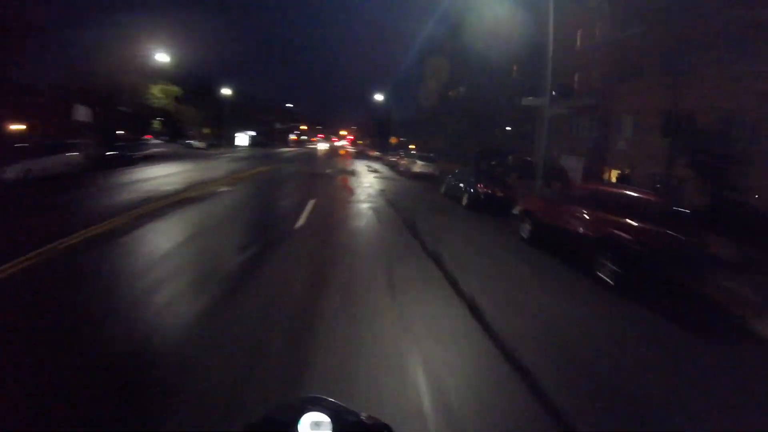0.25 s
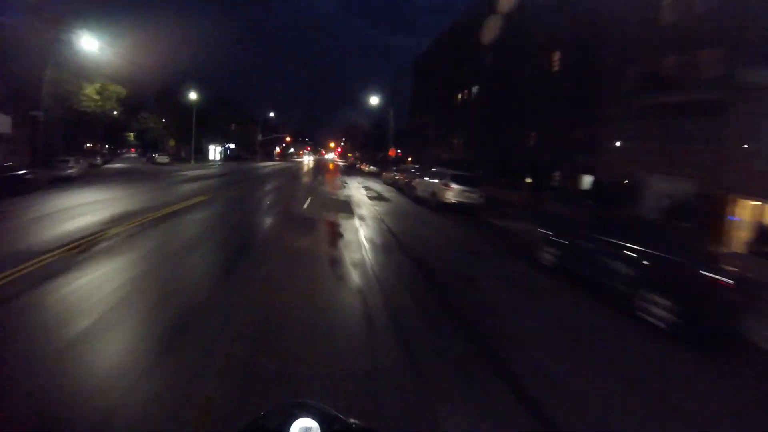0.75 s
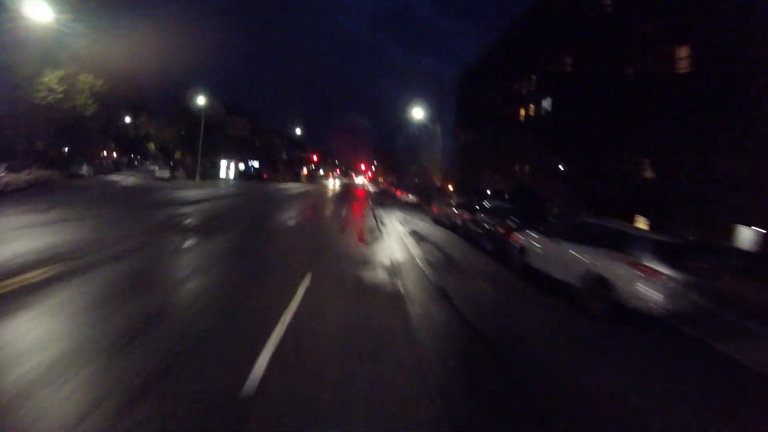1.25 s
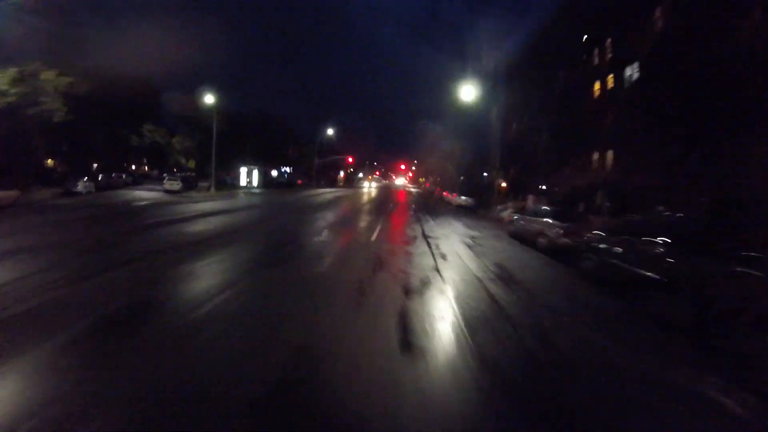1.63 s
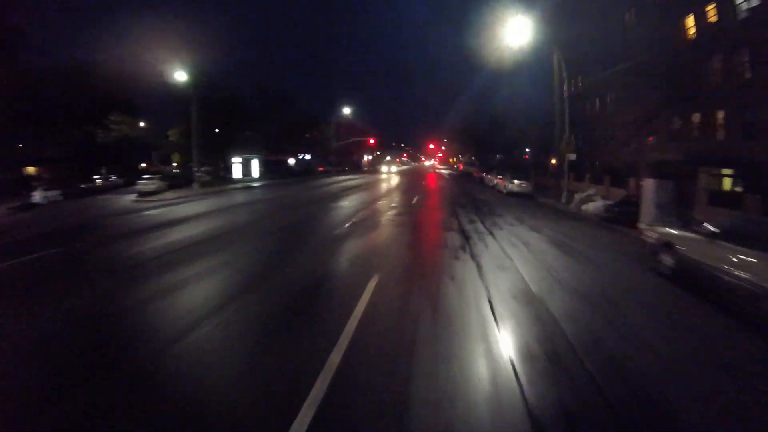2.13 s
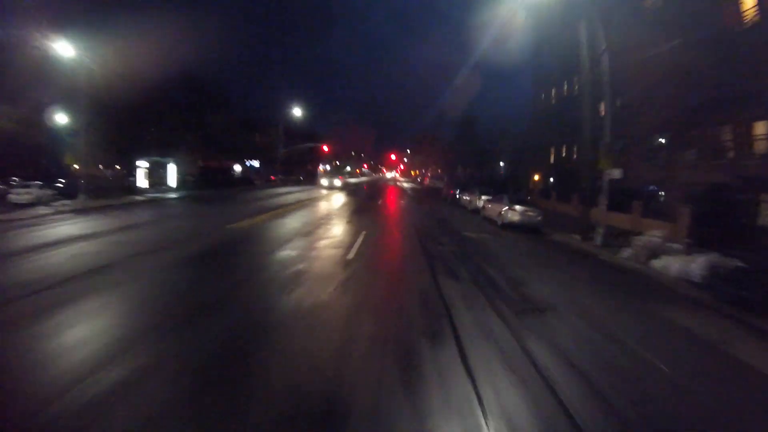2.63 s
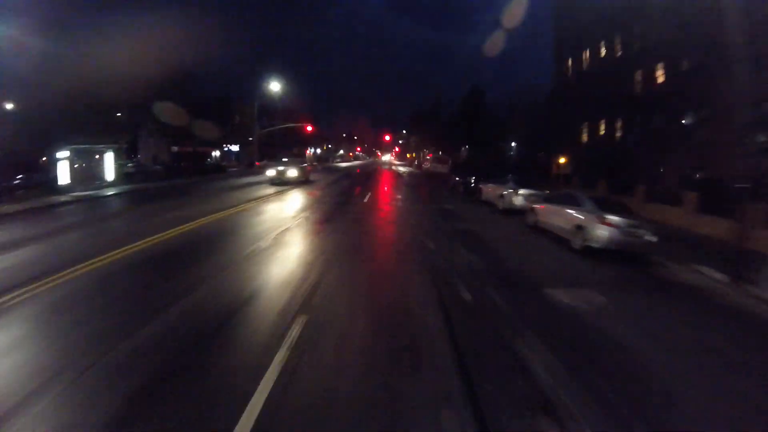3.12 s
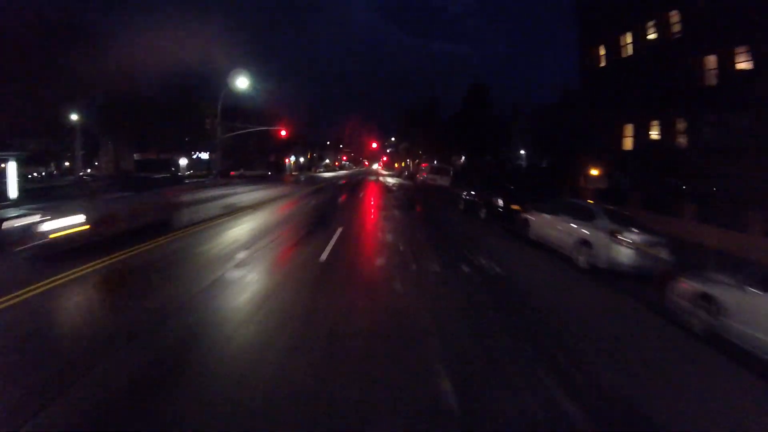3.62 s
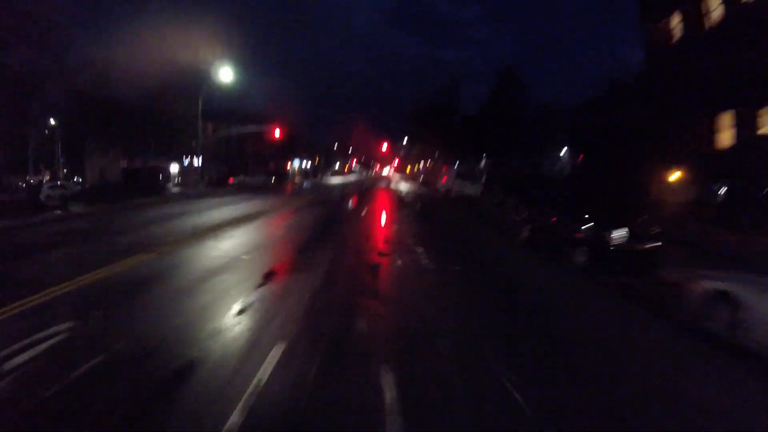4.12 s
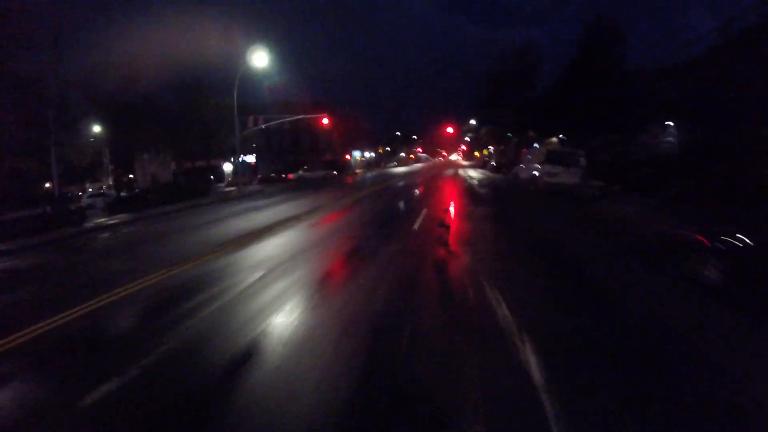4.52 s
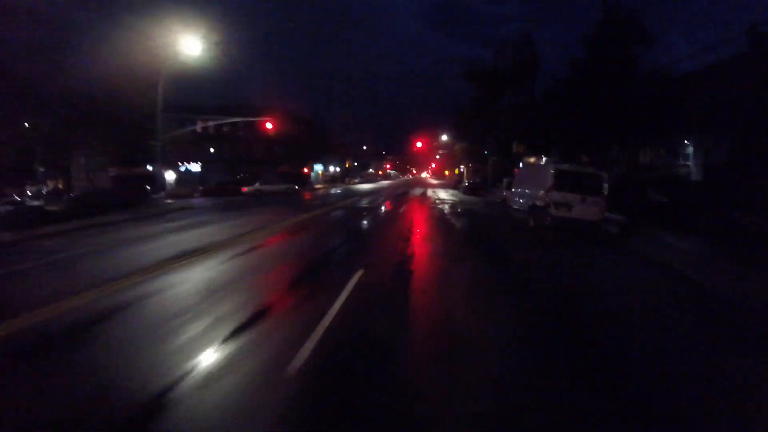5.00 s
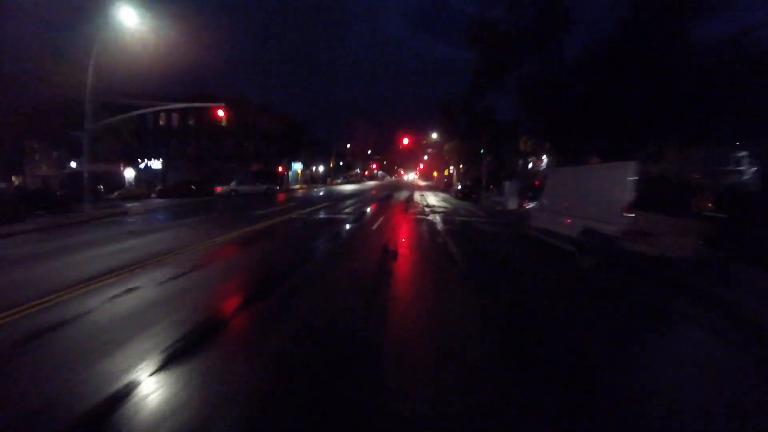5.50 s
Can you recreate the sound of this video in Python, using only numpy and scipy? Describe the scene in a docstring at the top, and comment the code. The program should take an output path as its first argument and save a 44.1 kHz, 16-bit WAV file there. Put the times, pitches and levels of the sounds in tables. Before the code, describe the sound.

An onboard motorcycle ride on a wet street, heard close through a small microphone shut in a case: muffled, mono, dull on top, peaks softly rounded. From 0 to 2.7 s a strong, smooth low engine hum slides gradually down under engine braking, then falls steeply until about 3.1 s. There, with the clutch pulled, it gives way to quieter, slow, uneven idle thumps. Around 3.55 s the hum returns, swooping up to a loud peak near 3.8 s, then settles and sinks steadily to the end at about 5.75 s. Fluttering low wind buffets and roar run throughout. Tyre hiss on water is clear at first, dips near 1.8 s, and grows much fainter after 4.3 s. Light valve clatter and a faint high buzz lie beneath. Road bumps give short dull knocks and rattles around 0.6-1.7 s, 3.5 s, 4.3 s and 5-5.6 s. Dry and open, without echo.

```python
"""Motorcycle slowing on a wet street

Heard from a small microphone shut in a case. The exhaust hums under engine braking (sines at firing orders),
gives way to uneven idle thumps (rung resonator) while the clutch is pulled, then climbs back in the lower gear.
Wind buffets and roars, tyres hiss through water, the case buzzes faintly (noise in flickering bands).
Valve gear clatters (noise in casing resonances); road bumps jolt the mount (rung clicks and noise bursts)."""
import sys
import numpy as np
from scipy import signal
from scipy.fft import rfft, irfft, next_fast_len
from scipy.io import wavfile

SR = 44100
rng = np.random.default_rng(int(sys.argv[2]) if len(sys.argv) > 2 else 0)


def materialize(psi):
    """Save the field psi as 16-bit PCM at rate SR to the path in sys.argv[1].

    A 1-D psi becomes a single channel; in a 2-D psi each row is a channel.
    """
    bounded = np.clip(np.atleast_2d(psi).T, -1, 1)
    quanta = np.round(bounded * 32767).astype(np.int16)
    wavfile.write(sys.argv[1], SR, quanta)


N = 253575

# wind on the case: (time [s], buffet level [dB], roar level [dB])
WIND_LEVELS = [(0.0, -25, -22), (0.2, -28, -24), (0.5, -19, -28.5), (0.63, -31, -22.5), (0.7, -24, -27),
               (1.07, -26, -26.5), (1.22, -25, -22), (1.31, -23.5, -27.5), (1.5, -23, -30.5),
               (1.73, -18.5, -26), (2.05, -31, -28.5), (2.15, -22.5, -29.5), (2.24, -31, -31.5),
               (2.7, -28, -28.5), (2.95, -33, -25.5), (3.1, -30.5, -27), (3.45, -20, -25),
               (3.88, -20, -21.5), (4.18, -28.5, -25.5), (4.3, -22.5, -29), (4.7, -26, -31),
               (5.26, -26.5, -33), (5.6, -20.5, -30), (5.75, -21, -35)]
# relative noise density of the buffets: (frequency [Hz], density [dB per Hz])
BUFFET_SPECTRUM = [(20, -2.5), (40, -5), (80, -1.5), (160, -6.5), (250, -12), (400, -31.5)]
# relative noise density of the wind roar: (frequency [Hz], density [dB per Hz])
ROAR_SPECTRUM = [(80, -5), (160, 0), (300, 0), (500, -3), (700, -15.5), (1200, -22)]
# tyre hiss on the wet road: (time [s], level [dB])
HISS_LEVELS = [(0.03, -31.5), (0.31, -28.5), (0.38, -36.5), (0.42, -32), (1.2, -31.5), (1.4, -30),
               (1.56, -32), (1.59, -36), (1.7, -34), (1.79, -36.5), (1.83, -41.5), (1.87, -35.5),
               (2.0, -31.5), (2.65, -30.5), (3.1, -33.5), (3.53, -33), (3.6, -29.5), (3.7, -30.5),
               (3.88, -35.5), (4.28, -35.5), (4.31, -42), (4.36, -36), (4.41, -42), (4.92, -42),
               (4.96, -41.5), (5.02, -44), (5.37, -45.5), (5.48, -41), (5.59, -45.5), (5.66, -48),
               (5.75, -48)]
# relative noise density of the hiss: (frequency [Hz], density [dB per Hz])
HISS_SPECTRUM = [(350, -25), (600, -3), (2490, -16), (3090, -21), (3770, -28.5), (4900, -50), (8290, -120)]
# treble of the hiss against its body: (time [s], gain [dB])
TREBLE_GAINS = [(0.0, -0.5), (1.6, 0.8), (2.2, -3), (2.9, -0.5), (3.5, 0), (4.1, 1.3), (4.6, -2.5),
                (5.2, 1.8), (5.75, 1.2)]
# case buzz before it follows the hiss: (time [s], level [dB])
BUZZ_LEVELS = [(0.0, -58), (1.1, -55.5), (1.5, -60), (2.7, -61), (3.1, -63.5), (3.6, -59.5), (4.2, -61.5),
               (5.0, -58), (5.75, -57.5)]
# two bands passed by the case, notch between: (frequency [Hz], relative density [dB per Hz])
CASE_SPECTRUM = [(3800, -9), (4400, -1), (5000, 1), (5500, -1.5), (6000, -19.5), (6480, -0.5),
                 (7000, -10.5), (8200, -15), (9000, -19.5), (9800, -34)]
# road bumps that jolt the mount: (time [s], rattle drive [dB], thud drive [dB], tick drive [dB])
BUMP_EVENTS = [(0.592, -14, -15, -55), (0.807, -15, -24, -57), (0.966, -9, -17.5, -58),
               (1.154, -26, -7, -54), (1.456, -24.5, -19.5, -60), (1.53, -18, -20, -56),
               (1.674, -12, -11.5, -53), (1.716, -17, -10, -51), (3.454, -10, -12, -60),
               (3.491, -19, -24, -59), (3.53, -25, -15, -60), (3.58, -22, -6, -60), (3.884, -12, -28, -50),
               (4.278, -20, -23, -58.5), (4.349, -11, -18.5, -59), (4.949, -16.5, -28, -52),
               (5.115, -22, -20, -55), (5.451, -18, -23, -60), (5.494, -16, -19, -56),
               (5.543, -19, -15, -54), (5.583, -19, -18, -60)]
# mount resonances: (frequency [Hz], relative gain [dB], t60 [s])
MOUNT_MODES = [(345, 3, 0.012), (700, 3, 0.0043), (1400, -12.5, 0.0043), (2600, -21.5, 0.01)]
# engine casing resonances under the valve gear: (frequency [Hz], width [Hz], level [dB])
CASING_MODES = [(1090, 150, -62.5), (1508, 74, -57.5), (1820, 56, -63), (2280, 120, -62.5),
                (2850, 100, -61.5), (3430, 170, -71.5), (4800, 58, -72.5), (5300, 100, -76)]
# clutch: (pulled [s], let go [s])
CLUTCH_TIMES_S = (3.08, 3.56)
# engine speed through two gears: (time [s], firing rate [Hz])
FIRING_RATES = [(0.0, 138.8), (0.3, 134.8), (1.4, 123.1), (1.6, 120.2), (1.8, 119.7), (2.6, 112.2),
                (2.7, 110.0), (2.76, 105.8), (2.95, 75.6), (3.1, 57.3), (3.55, 66.7), (3.65, 82.3),
                (3.7, 96.1), (3.84, 125.5), (3.9, 118.7), (4.0, 120.1), (4.6, 110.3), (5.0, 100.9),
                (5.75, 84.8)]
# exhaust hum: (time [s], fundamental level [dB], second order level [dB])
HUM_LEVELS = [(0.0, -17.5, -25), (0.2, -15.5, -31.5), (0.4, -14.5, -27), (0.6, -16.5, -26.5),
              (1.0, -14, -24.5), (1.2, -17, -23.5), (1.4, -15, -25), (2.75, -14, -24.5), (2.85, -15, -28),
              (2.95, -20.5, -29.5), (3.06, -20, -25), (3.58, -22.5, -30), (3.65, -13, -28),
              (3.75, -12, -21), (3.8, -10, -29), (3.86, -17, -32), (3.93, -16.5, -25), (4.0, -14.5, -23.5),
              (4.6, -13, -24), (4.8, -13.5, -28.5), (5.0, -15.5, -25.5), (5.2, -13, -26.5),
              (5.6, -15, -25.5), (5.75, -16.5, -32)]
# pipe resonances that lift gliding orders: (frequency [Hz], gain [dB])
PIPE_GAINS = [(280, -7.5), (340, -3), (390, 1.5), (430, -6), (460, -18.5), (500, -7.5), (545, -3.5),
              (590, -12), (680, -8.5)]
# orders coloured by the pipe: (multiple of firing rate [1], level on top of pipe gain [dB])
PIPE_ORDERS = [(3, -38), (4, -36.5), (5, -36)]
# weaker half orders: (multiple of firing rate [1], level against fundamental [dB])
HALF_ORDERS = [(.5, -27), (1.5, -32.5), (2.5, -27.5)]

LULL_DB, LULL_RATE_HZ = 2.5, 7.0   # random rise and fall of the buffets
TREBLE_FROM_HZ = 1400
BUZZ_SHARE = 0.34   # share of the hiss level swing, in dB, taken by the buzz
IDLE_DB, IDLE_CATCH_DB, IDLE_SETTLE_S = -25, 0.5, 0.06   # first firings are stronger
CUTOFF_HZ = 9900


def from_db(db):
    """Decibels to amplitude gain."""
    return 10 ** (np.asarray(db) / 20)


def rms_one(x):
    """Scale to unit rms."""
    return x / np.sqrt(np.mean(x ** 2) + 1e-20)


def in_time(rows):
    """Interpolate each column of a time table to one value per sample."""
    times_s, *columns = np.transpose(rows)
    return [np.interp(np.arange(N) / SR, times_s, column) for column in columns]


def by_pitch(points, hz):
    """Read a frequency table at a moving pitch."""
    return np.interp(hz, *np.transpose(points))


def lowpass(x, order, cutoff_hz):
    """Butterworth low-pass."""
    return signal.sosfilt(signal.butter(order, cutoff_hz, fs=SR, output="sos"), x)


def drift(rate_hz):
    """Slow random curve of spread 1: noise twice through a one-pole low-pass."""
    step = 20   # samples per drawn point
    r = np.exp(-2 * np.pi * rate_hz * step / SR)
    noise = rng.standard_normal(N // step + 2002)
    slow = signal.lfilter([1], [1, -2 * r, r * r], noise)[2000:]   # drop the start-up
    return np.interp(np.arange(N) / step, np.arange(len(slow)), rms_one(slow))


def turbulence(spectrum, shared_db, own_db, rate_hz):
    """Coloured noise in half-octave bands that flicker partly together, partly alone; rms 1."""
    size = next_fast_len(N)
    hz, db = np.transpose(spectrum)
    octave = np.log2(np.maximum(np.arange(size // 2 + 1) * SR / size, 1))
    density_db = np.interp(octave, np.log2(hz), db, left=-90, right=-90)
    coloured = rfft(rng.standard_normal(size)) * from_db(density_db)
    out, together = 0, drift(rate_hz)
    for centre in np.arange(np.floor(np.log2(hz[0])), np.log2(hz[-1]) + 1, 0.5):
        share = np.clip(1 - 2 * abs(octave - centre), 0, 1)   # neighbouring shares add up to one
        band = irfft(coloured * share, size)[:N]
        out = out + band * from_db(shared_db * together + own_db * drift(rate_hz))
    return rms_one(out)


def ring(x, hz, t60_s):
    """Two-pole resonator: a unit click sets a decaying sine of height 1 ringing."""
    r, w = from_db(-60 / (t60_s * SR)), 2 * np.pi * hz / SR
    return signal.lfilter([0, np.sin(w)], [1, -2 * r * np.cos(w), r * r], x + 1e-18)


def wind(gust):
    """Low buffets with random lulls, and a higher roar that follows the quick eddies."""
    buffet_db, roar_db = in_time(WIND_LEVELS)
    buffet = turbulence(BUFFET_SPECTRUM, shared_db=0.5, own_db=-1.3, rate_hz=22)
    roar = turbulence(ROAR_SPECTRUM, shared_db=0.72, own_db=1.0, rate_hz=26)
    lull_db = LULL_DB * drift(LULL_RATE_HZ)
    return from_db(buffet_db + lull_db) * buffet + from_db(roar_db + 1.1 * gust) * roar


def spray(gain_db):
    """Tyres tear through the film of water; the treble share wanders with the surface."""
    hiss = turbulence(HISS_SPECTRUM, shared_db=0.55, own_db=1.12, rate_hz=27)
    body = signal.filtfilt(*signal.butter(1, TREBLE_FROM_HZ, fs=SR), hiss)
    treble = from_db(in_time(TREBLE_GAINS)[0]) * (hiss - body)
    return from_db(gain_db) * (body + treble)


def case_buzz(hiss_db, gust, firing):
    """Noise in two case bands; every firing shakes the case a little."""
    level_db = in_time(BUZZ_LEVELS)[0] + BUZZ_SHARE * (hiss_db - hiss_db[0])
    noise = turbulence(CASE_SPECTRUM, shared_db=0.94, own_db=0.0, rate_hz=14)
    return from_db(level_db + 0.5 * gust + 0.59 * firing) * noise


def bumps():
    """Each jolt: a low thud, a burst of soft rattling contacts in the mount and a tick of the case."""
    jolts = np.zeros((3, N))
    for time_s, *drive_db in BUMP_EVENTS:
        jolts[:, round(time_s * SR)] = from_db(drive_db)
    knock, thud, tick = jolts
    fade = np.exp(-1 / (0.0046 * SR))   # time constant in s
    burst = signal.lfilter([0.07], [1, -fade], knock + 1e-18) * rng.standard_normal(N)
    rattle = 0.5 * knock + burst
    body = ring(thud, hz=96, t60_s=0.048)
    for hz, db, t60_s in MOUNT_MODES:
        body += from_db(db - 3.5) * ring(rattle, hz, t60_s)
    ticks = ring(tick, hz=5100, t60_s=0.006) + ring(tick, hz=6600, t60_s=0.006)
    return lowpass(body, 4, 3500) + from_db(1.0) * ticks


def clatter(firing):
    """Valve-gear noise, pulsing with the firing, in the resonances of the casing."""
    noise, out = rng.standard_normal(N) * from_db(2.1 * firing), 0
    for hz, width_hz, db in CASING_MODES:
        r = np.exp(-np.pi * width_hz / SR)
        poles = [1, -2 * r * np.cos(2 * np.pi * hz / SR), r * r]
        out = out + from_db(db) * rms_one(signal.lfilter([1, 0, -1], poles, noise))
    return lowpass(out, 4, 5500)


def idle():
    """Slow uneven firings thump in the pipe while the clutch is pulled."""
    pulled_s, let_go_s = CLUTCH_TIMES_S
    rate_hz = 44 * (1 + 0.252 * drift(20))
    fired = np.diff(np.floor(np.cumsum(rate_hz) / SR), prepend=0)
    thumps = ring(fired * from_db(2.7 * drift(40)), hz=86, t60_s=0.14)
    since_s = np.arange(N) / SR - pulled_s
    gate = np.clip(1 + np.minimum(since_s, let_go_s - pulled_s - since_s) / 0.014, 0, 1)
    level_db = IDLE_DB + IDLE_CATCH_DB * np.exp(-np.maximum(since_s, 0) / IDLE_SETTLE_S)
    return gate * from_db(level_db) * rms_one(lowpass(thumps, 2, 200))


def exhaust():
    """Low orders of the firing rate as sines in step, silent at idle; also returns the firing beat."""
    (rate_hz,), (first_db, second_db) = in_time(FIRING_RATES), in_time(HUM_LEVELS)
    pulled_s, let_go_s = CLUTCH_TIMES_S
    t = np.arange(N) / SR
    engaged = np.clip(np.maximum(pulled_s - t, t - let_go_s) / 0.019, 0, 1)
    turn = 2 * np.pi * np.cumsum(rate_hz * (1 + 0.0024 * drift(8.5))) / SR
    # the pipe pushes the second order ahead as the revs rise
    lead_rad = np.clip(0.04 * (rate_hz - 78), -1, 1.5)
    hum = from_db(first_db + 0.22 * drift(11)) * np.cos(turn)
    hum += from_db(second_db + 1.8 * drift(25)) * np.cos(2 * turn + lead_rad)
    for multiple, db in PIPE_ORDERS:
        level_db = db + by_pitch(PIPE_GAINS, multiple * rate_hz) + 1.1 * drift(24)
        hum += from_db(level_db) * np.cos(multiple * turn - 1)
    for multiple, db in HALF_ORDERS:
        hum += from_db(first_db + db + 1.9 * drift(12)) * np.cos(multiple * turn - multiple)
    return np.sqrt(2) * engaged * hum, engaged * np.cos(turn)   # sqrt(2): sine levels are rms


def scene():
    """Air, road, case and engine summed at the microphone."""
    hum, firing = exhaust()
    hiss_db, = in_time(HISS_LEVELS)
    gust = drift(38)   # quick eddies shared by roar, hiss and buzz
    air = wind(gust)
    hiss = spray(hiss_db + 0.5 * gust + 0.6 * firing)
    buzz = case_buzz(hiss_db, gust, firing)
    engine = clatter(firing) + idle() + hum
    return (air + hiss + buzz + bumps() + engine)[None]


def record(dry):
    """Soft clipping rounds the peaks; a steep low-pass cuts the top."""
    rounded = 0.79 * np.tanh(dry / 0.83)
    return signal.sosfilt(signal.cheby2(12, 70, CUTOFF_HZ, fs=SR, output="sos"), rounded)


dry = scene()
out = record(dry)
materialize(out)
```